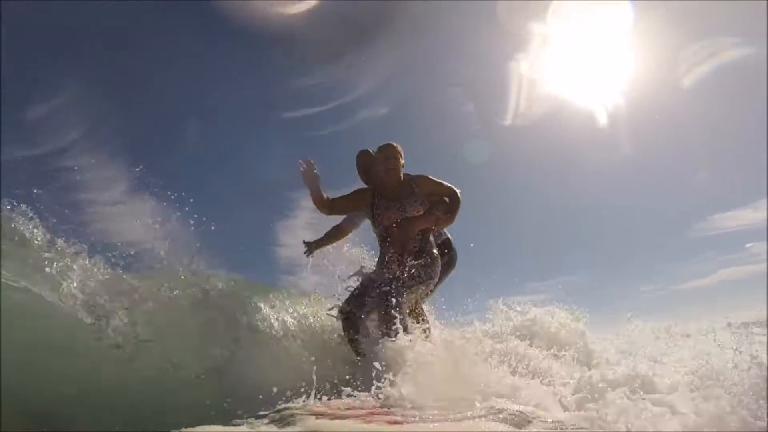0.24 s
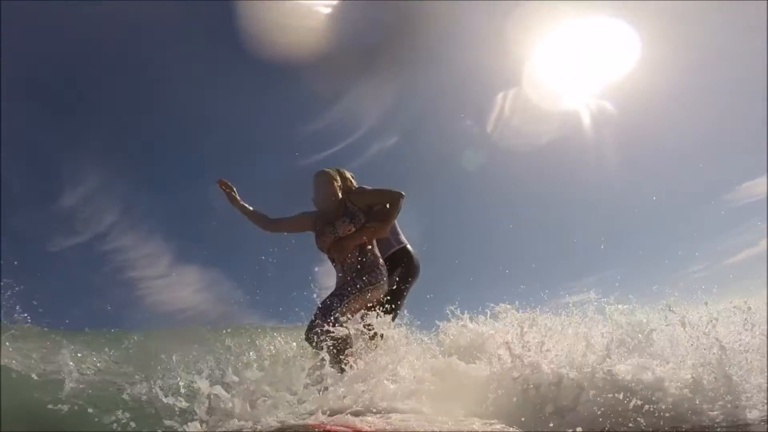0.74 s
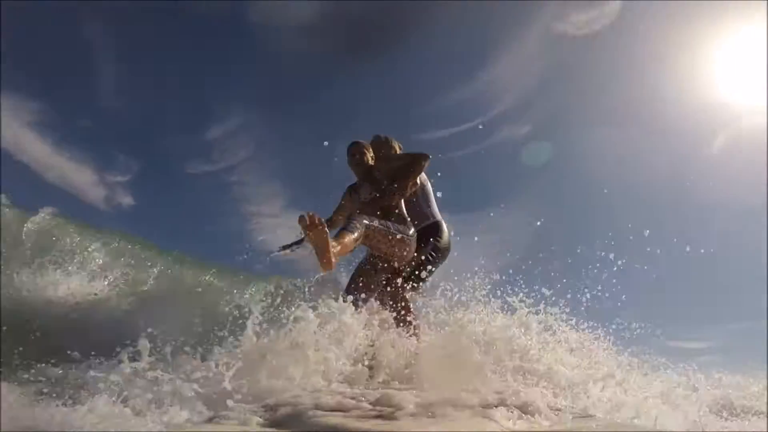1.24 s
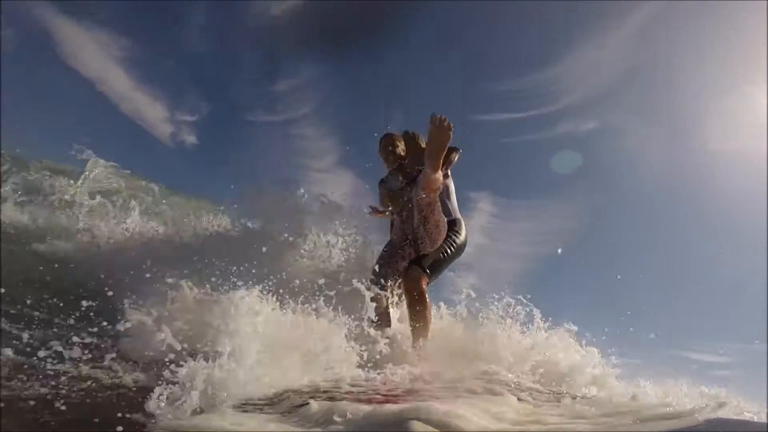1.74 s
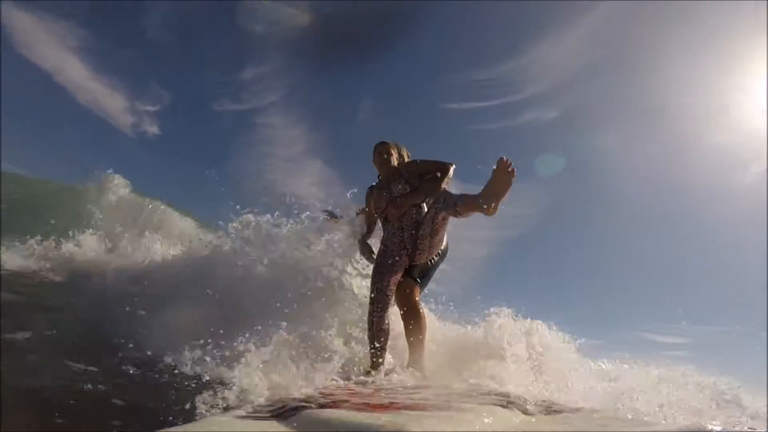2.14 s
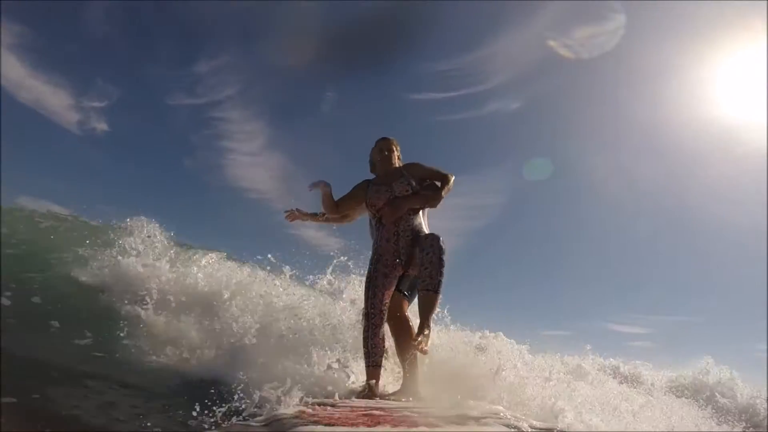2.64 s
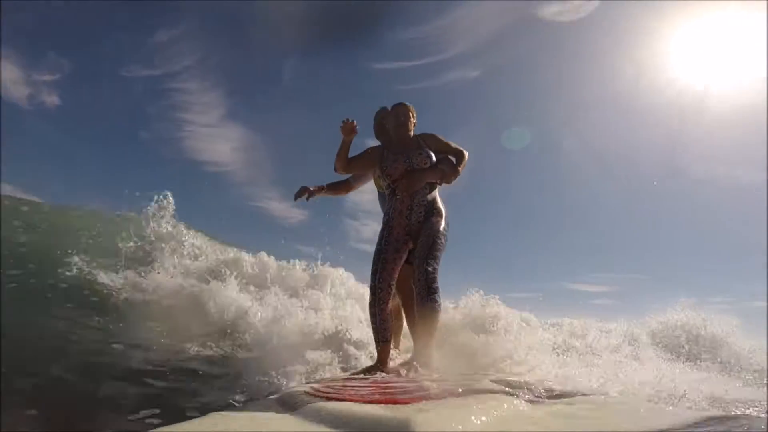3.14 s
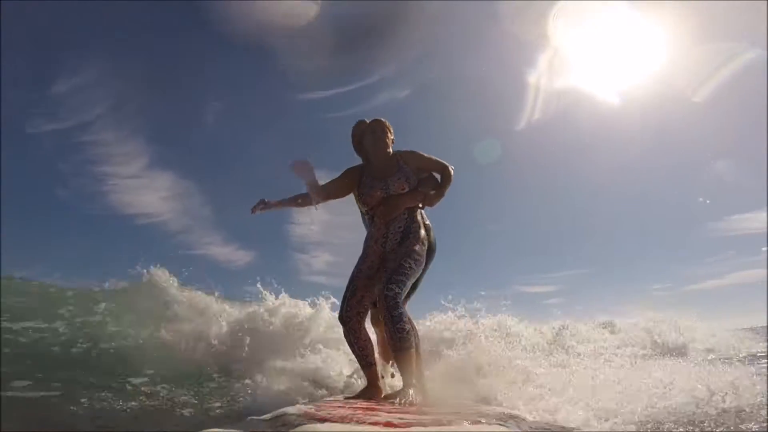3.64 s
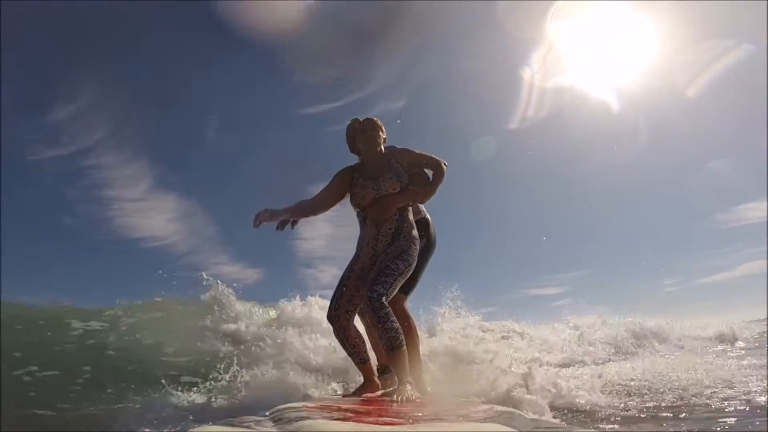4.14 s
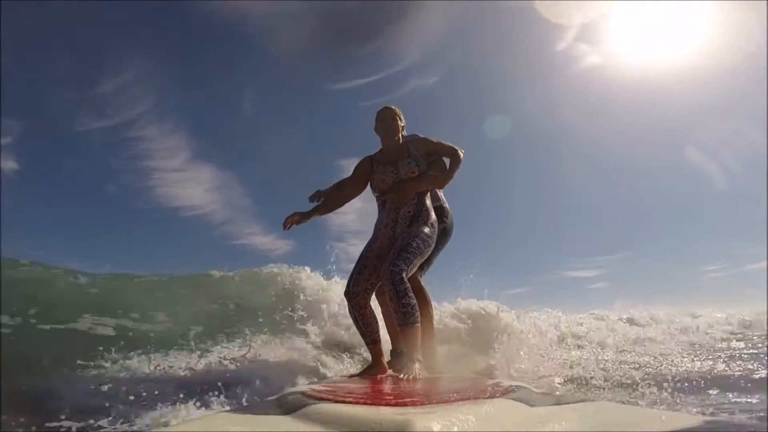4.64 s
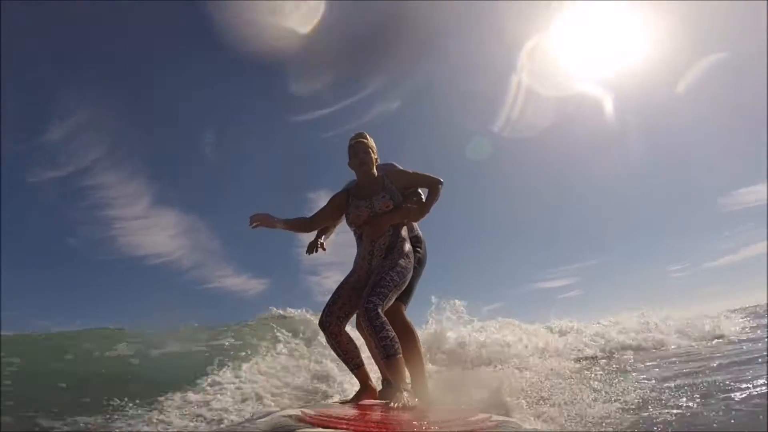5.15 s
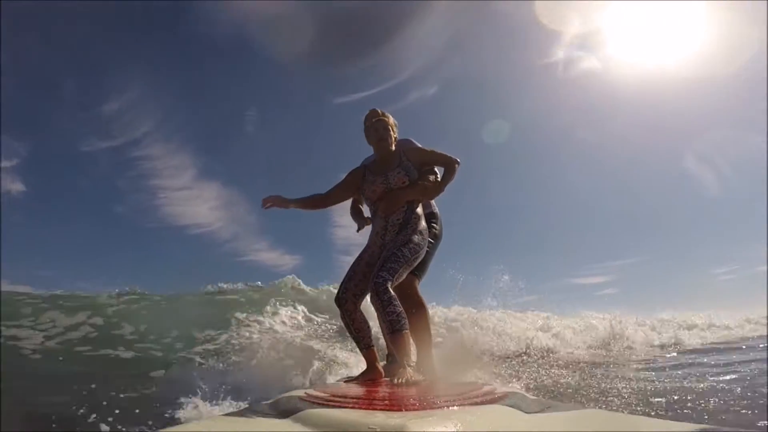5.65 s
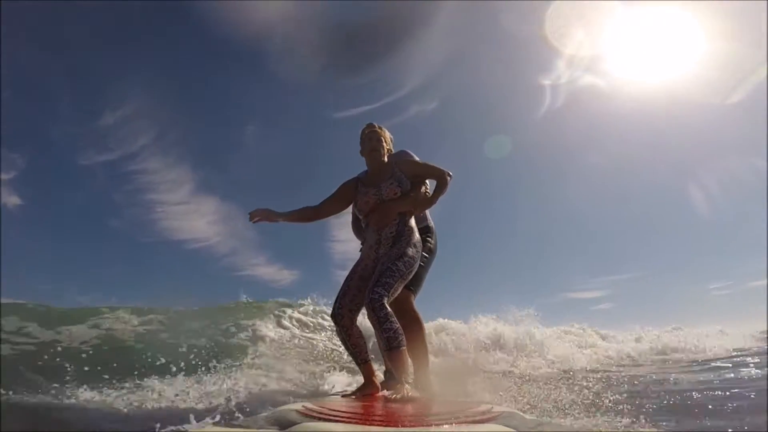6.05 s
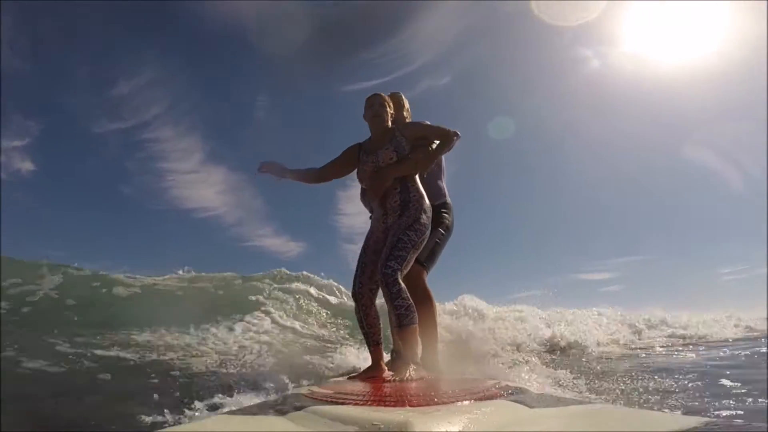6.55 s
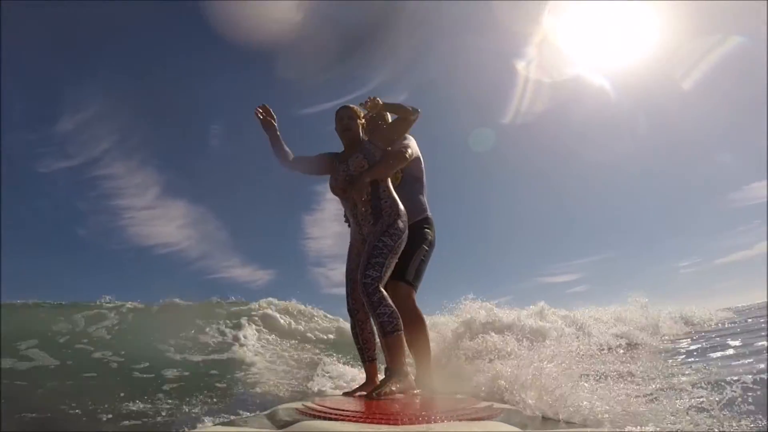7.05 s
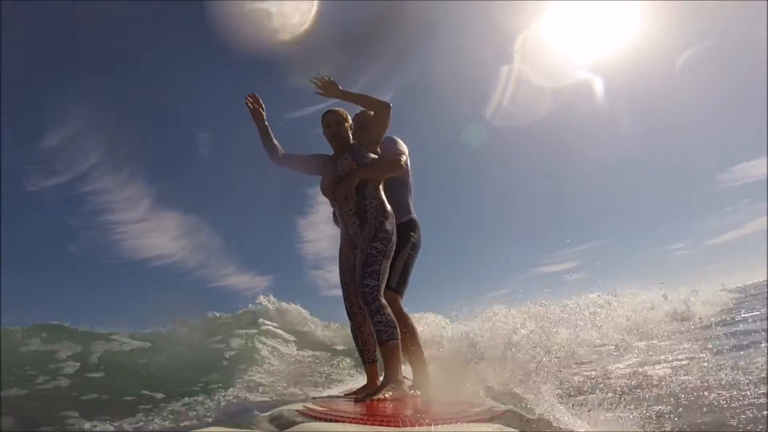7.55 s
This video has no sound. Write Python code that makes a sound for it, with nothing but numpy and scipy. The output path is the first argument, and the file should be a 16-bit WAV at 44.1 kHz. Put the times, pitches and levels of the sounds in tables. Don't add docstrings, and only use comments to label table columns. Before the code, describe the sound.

Heard from inside a sealed housing on a surfboard nose, the wave is muffled and boxy, mostly low-mid slosh over a trembling rumble near 55 Hz, with very little fizz on top. From 0.3 to 0.8 s hollow knocks, backward-sounding air gulps and splashes crowd together, with short rough squeaks at 0.6 and 0.7. A heavy thump lands around 1.35, then looser slaps at 1.7 and 2.2 and a knot of droplet ticks at 2.75. From 2.6 to 4 s rumble and surges swell, with repeated thuds around 3.5 to 3.9 and a faint high whistle just after 3. Near 4.8 to 4.9 it thins for tiny chirps; a strong slap hits at 5.1. Knocks follow at 5.7 and 6 to 6.6, with bright ticks around 6.5. Gulps cluster near 7, a hard splashy crack comes at 7.44, then calmer water.

```python
import sys
import numpy as np
from scipy import signal
from scipy.fft import rfft, irfft
from scipy.io import wavfile
from scipy.ndimage import uniform_filter1d

SR = 44100
rng = np.random.default_rng(int(sys.argv[2]) if len(sys.argv) > 2 else 0)


def generate_wav(signal):
    frames = np.transpose(np.atleast_2d(signal))
    scaled = np.clip(frames, -1, 1) * 32767
    pcm = np.round(scaled).astype(np.int16)
    wavfile.write(sys.argv[1], SR, pcm)


def elevation(decibels):
    levels = np.asarray(decibels, float)
    return 10 ** (levels / 20)


N = 343980
TIME = np.arange(N) / SR
FREQ = np.maximum(np.fft.rfftfreq(N, 1 / SR), 1)


def unit(x):
    return x / np.sqrt(np.mean(x ** 2))


def slope_db(points):
    hz, db = np.transpose(points)
    return np.interp(np.log(FREQ), np.log(hz), db)


def walk(rate):
    hold = int(SR / rate)
    steps = np.repeat(rng.standard_normal(N // hold + 1), hold)
    smooth = uniform_filter1d(uniform_filter1d(steps, hold), hold)
    return unit(smooth[:N])


def bursts(chance, tail_s, spread_db):
    hits = np.zeros(N)
    size_db = -spread_db * np.log(1 - .985 * chance[:, 1])
    np.add.at(hits, (chance[:, 0] * N).astype(int), elevation(size_db) ** 2)
    decay = np.exp(-1 / (tail_s * SR))
    softened = signal.lfilter([1], [1, -decay ** 4], hits)
    power = signal.lfilter([1], [1, -decay], softened)
    return np.sqrt(power + 1e-18)


def swells(steady_db, s, hold_s, db, rise_db_s, fall_db_s):
    power = elevation(steady_db) ** 2
    for at, hold, top_db in zip(s, hold_s, db):
        near = slice(max(int((at - .3) * SR), 0), int((at + hold + .5) * SR))
        t = TIME[near]
        before_db = (at - t) * rise_db_s
        after_db = (t - at - hold) * fall_db_s
        power[near] += elevation(top_db - np.maximum(np.maximum(before_db, after_db), 0)) ** 2
    return 10 * np.log10(power)


def add(out, at_s, hz, db, t60_s, rise_s, rough):
    t = np.arange(int(.25 * SR)) / SR
    drift = np.cumsum(rng.standard_normal(len(t))) * rough * np.sqrt(hz / SR)
    rise = (1 - np.exp(-t / rise_s)) ** 2
    decay = np.exp(-np.log(1000) * t / t60_s)
    ring = np.sin(2 * np.pi * hz * t + drift) * rise * decay
    start = int(at_s * SR)
    out[start:start + len(t)] += (elevation(db) * ring / np.max(np.abs(ring)))[:N - start]


def flow():
    # t/s, churn/dB, spray/dB
    flow_levels = [(0, -27.5, -55), (.6, -22, -56.5), (1.05, -28.5, -62), (1.39, -29, -58),
                   (2.48, -26.5, -58), (3.32, -36.5, -55.5), (3.68, -27, -61.5), (4.12, -29.5, -62),
                   (4.44, -16.5, -60.5), (4.75, -41, -71.5), (4.98, -30, -67.5), (5.33, -43, -69),
                   (5.64, -25.5, -66), (5.98, -28.5, -68), (6.86, -24, -63.5), (7.36, -30.5, -69.5),
                   (7.56, -39, -70.5), (7.8, -36, -62.5)]
    s, churn_db, spray_db = np.transpose(flow_levels)
    return np.interp(TIME, s, churn_db), np.interp(TIME, s, spray_db)


def squeaks():
    # t/s, length/s, start f/Hz, highest f/Hz, level/dB, roughness 0-1
    whistles = [
        (.600, .03, 3000, 3650, -36, .17),
        (.720, .037, 2950, 3250, -41, .05),
        (3.0, .46, 5300, 5350, -61, .16),
        (4.793, .022, 2900, 3900, -57, .12),
        (4.912, .03, 2500, 3650, -43, .15),
    ]
    out = np.zeros(N)
    for s, length_s, start_hz, top_hz, db, rough in whistles:
        done = np.clip((TIME - s) / length_s, 0, 1)
        hz = start_hz + (top_hz - start_hz) * np.sin(2.6 * done)
        jitter = rough * uniform_filter1d(rng.standard_normal(N), size=24)
        phase = np.cumsum(2 * np.pi * hz / SR + jitter)
        octave = elevation(-7 - 200 * rough) * np.sin(2 * phase)
        out += elevation(db) * np.sin(np.pi * done) * (np.sin(phase) + octave)
    return out


def gulps():
    # end t/s, peak level/dB, f/Hz, growth t60/s
    pockets = [(.579, -7.5, 480, 0.12), (.54, -14.5, 1180, 0.055), (.728, -10.5, 376, 0.065),
               (.592, -24, 1160, .05), (0.8, -20, 771, .06), (.42, -19, 542, 0.12), (.562, -9, 600, 0.081),
               (1.435, -12.5, 262, 0.088), (1.605, -12, 199, 0.11), (1.62, -17, 1000, 0.065),
               (1.62, -12.5, 452, 0.05), (2.06, -21, 538, 0.085), (4.47, -13.5, 276, 0.11),
               (4.99, -21, 405, 0.076), (3.497, -12, 476, 0.03), (3.786, -9, 352, 0.073),
               (3.815, -11, 402, .08), (3.826, -20, 997, 0.078), (6.954, -13.5, 361, 0.1),
               (6.997, -9, 211, .08), (7.014, -9.5, 422, 0.052), (7.07, -17, 864, .08),
               (7.137, -19, 566, 0.064), (7.298, -20, 746, 0.054), (7.46, -6, 940, 0.056),
               (7.53, -17.5, 373, .08)]
    out = np.zeros(N)
    for s, db, hz, t60_s in pockets:
        add(out, N / SR - s, hz, db, t60_s, rise_s=0.0012, rough=0.65)
    return signal.sosfilt(signal.butter(4, 1900, fs=SR, output="sos"), out[::-1])


def drops():
    # t/s, upper ring level/dB, lower ring level/dB, lower ring f/Hz
    big_drops = [(0.219, -31, -28, 2800), (0.684, -43, -29.5, 2600), (0.785, -39, -48, 2700),
                 (0.841, -29.5, -31, 2850), (1.261, -47, -36.5, 2980), (1.3456, -31, -42, 2900),
                 (1.417, -43, -26.5, 3020), (1.4427, -41, -33, 3000), (2.151, -36, -29.5, 2850),
                 (2.161, -44, -33, 3300), (2.177, -31, -42, 2850), (2.731, -46, -27, 2850),
                 (2.7416, -36, -24, 2940), (2.7445, -47, -27, 2750), (2.7495, -42, -45, 2800),
                 (2.7565, -38, -45, 3000), (2.7533, -41, -27, 3300), (2.7604, -35, -36, 2700),
                 (3.822, -54, -31.5, 2940), (3.955, -50, -30, 2850), (3.9777, -37, -36, 3230),
                 (4.985, -49, -29, 2850), (5.009, -31, -29, 3000), (5.1317, -40, -40, 2800),
                 (5.138, -36, -36, 3200), (5.2205, -36, -39, 2900), (5.226, -36, -44, 3200),
                 (5.7593, -33.5, -49, 3300), (6.356, -27, -29.5, 3020), (6.459, -26, -21, 3180),
                 (6.483, -25.5, -30, 3220), (6.76, -48, -49, 3000), (6.5062, -32, -36, 3470),
                 (7.45, -46, -38, 3370), (7.457, -46, -30, 2770), (7.463, -45, -40, 3500),
                 (7.474, -52, -42, 3370), (7.492, -52, -41, 3280)]
    # t/s, upper ring level/dB, lower ring level/dB
    specks = [(.2074, -40, -40), (.8314, -45, -47), (1.2817, -45, -47), (1.4087, -42.5, -37),
              (1.4225, -44, -44), (2.038, -47, -36), (2.0742, -43, -37), (2.117, -45, -36),
              (2.185, -39, -46), (2.196, -45, -44), (2.3501, -56, -35), (2.3984, -55, -44),
              (3.266, -51, -40), (3.885, -44, -46), (3.8984, -39, -45), (3.989, -36, -42),
              (3.997, -36, -51), (4.1045, -39, -40), (4.2712, -52, -43), (4.3914, -44, -42),
              (4.4403, -41, -52), (4.474, -41, -60), (4.4823, -37, -40), (4.5136, -47, -38),
              (4.4445, -42, -48), (4.4935, -39, -37), (4.6289, -44, -45), (4.6405, -50, -42),
              (4.844, -56, -50), (4.9152, -52, -48), (4.925, -46, -45), (4.936, -52, -31),
              (4.9395, -48, -35), (4.9674, -52, -38), (5.016, -50, -46), (5.122, -48, -42),
              (5.144, -42, -39), (5.153, -35, -46), (5.1624, -44, -51), (5.2001, -43, -38),
              (5.2345, -50, -48), (5.2455, -49, -47), (5.2616, -41, -42), (5.3865, -61, -42),
              (5.7329, -48.5, -40), (5.7405, -50, -49), (6.2981, -44, -37), (6.3174, -43, -41),
              (6.326, -43, -41), (6.348, -37, -43), (6.4516, -44, -40), (6.4944, -41, -45),
              (6.4675, -40, -46), (6.3625, -43, -46), (6.305, -46, -42), (6.379, -46, -48),
              (5.0135, -45, -46), (7.444, -51, -37), (7.468, -52, -33), (7.48, -55, -38)]
    # f/Hz, level/dB, t60/s
    upper_rings = [(3830, 1.5, 0.0021), (4500, 4.5, 0.0034), (5060, 4.5, 0.009), (5600, 2, 0.013),
                   (6400, -6, 0.0049)]
    snap_pitches = (4250, 5510)
    upper, snaps, lower = np.zeros((3, N))
    pitch_hz = 2850 * (1 + 0.1 * rng.standard_normal(len(specks)))
    small_drops = [(*row, hz) for row, hz in zip(specks, pitch_hz)]
    for s, upper_db, lower_db, hz in big_drops + small_drops:
        add(lower, s + 0.0008, hz, lower_db + 2.5, t60_s=0.0093, rise_s=0.00059, rough=0.8)
        add(lower, s, 2160, lower_db - 10.5, t60_s=0.015, rise_s=0.0012, rough=0.26)
        snaps[int((s + .0004) * SR)] += elevation(upper_db + 10.5)
        for snap_hz in snap_pitches:
            add(snaps, s, snap_hz, upper_db - 12, t60_s=0.0084, rise_s=0.00015, rough=1.6)
        for ring_hz, ring_db, t60_s in upper_rings:
            stray = rng.standard_normal(2)
            stray_hz = ring_hz * (1 + .04 * stray[0])
            stray_db = upper_db + ring_db - 13 + 1.1 * stray[1]
            add(upper, s, stray_hz, stray_db, t60_s, rise_s=0.00019, rough=0.38)
    snaps = signal.sosfilt(signal.butter(3, 3600, "high", fs=SR, output="sos"), snaps)
    lower = signal.sosfilt(signal.butter(4, 3880, fs=SR, output="sos"), lower)
    return signal.sosfilt(signal.butter(7, 6300, fs=SR, output="sos"), upper + snaps + lower)


def slaps():
    # t/s, peak level/dB, f/Hz, t60/s
    hull_slaps = [(0.179, -12, 335, .06), (0.334, -12, 404, 0.074), (0.453, -0.5, 937, 0.026),
                  (0.625, -10, 355, 0.072), (0.75, -2.5, 239, 0.061), (1.352, 1, 195, 0.077),
                  (1.541, -15, 369, .06), (1.693, -5, 375, 0.065), (1.838, -11.5, 296, .06),
                  (2.205, -4.5, 153, .08), (2.378, -17, 350, 0.08), (2.635, -3.5, 337, 0.1),
                  (2.682, -24, 415, 0.064), (2.758, -27, 341, 0.092), (2.943, -10.5, 152, 0.13),
                  (3.187, -4, 345, 0.097), (3.26, -7.5, 571, 0.15), (3.491, -1.5, 362, 0.081),
                  (3.523, -1, 252, 0.095), (3.578, -10, 342, 0.071), (3.613, -13, 377, 0.098),
                  (3.66, -4.5, 377, 0.099), (3.749, 1, 163, 0.095), (3.884, 4, 344, 0.035),
                  (4.249, -6.5, 269, 0.17), (4.71, -15, 263, 0.086), (4.981, -14, 401, 0.097),
                  (5.12, 3, 344, 0.094), (5.173, -7.5, 248, 0.13), (5.526, -12, 462, 0.11),
                  (5.624, -6, 161, 0.058), (5.674, -0.5, 338, 0.042), (5.712, -4, 365, 0.094),
                  (5.947, -8.5, 369, 0.25), (6.121, -9, 336, 0.092), (6.207, -10, 195, .07),
                  (6.272, -3.5, 266, 0.06), (6.384, -10.5, 250, 0.05), (6.433, -7, 370, 0.087),
                  (6.484, -5, 377, 0.2), (6.506, -12, 400, .07), (6.605, -1.5, 260, 0.15),
                  (6.926, -3.5, 376, 0.2), (7.166, -10, 263, 0.086), (7.391, -11, 278, 0.055),
                  (7.437, 0, 400, 0.069), (7.447, -5, 605, 0.045)]
    # t/s, peak level/dB, f/Hz, t60/s
    deck_knocks = [(0.342, -4.5, 1033, 0.052), (0.454, -19, 920, 0.065), (.459, -3.5, 970, 0.046),
                   (.3, -13, 563, .07), (.503, -6, 603, 0.053), (.533, -4, 710, 0.06),
                   (0.553, -3, 605, 0.05), (0.567, 5, 483, 0.051), (.628, -5, 810, .04),
                   (.636, 0.5, 769, 0.072), (.675, -6, 730, 0.033), (.722, -7, 413, 0.031),
                   (1.161, -8, 617, 0.039), (1.192, -17, 705, 0.042), (1.717, -10, 716, 0.05),
                   (2.059, -17, 548, 0.072), (2.685, -9, 685, 0.089), (4.336, -9, 658, 0.037),
                   (4.446, -12, 526, 0.025), (4.7, -12, 546, 0.048), (4.964, -15, 884, .06),
                   (5.08, -13, 620, 0.05), (5.124, -1.5, 685, 0.047), (5.649, -10, 594, 0.055),
                   (5.957, -14, 600, 0.043), (6.232, -3.5, 984, 0.024), (6.983, -10, 770, 0.04),
                   (7.439, -2.5, 823, 0.045), (7.458, -7, 1310, 0.02)]
    out = np.zeros(N)
    for rows, rise_s in ((hull_slaps, .0025), (deck_knocks, .0009)):
        for s, db, hz, t60_s in rows:
            add(out, s, hz, db - 9.5, max(t60_s, .01), rise_s, rough=0.52)
            add(out, s, 1.9 * hz, db - 26, max(0.29 * t60_s, .01), rise_s=0.00063, rough=0.51)
    return signal.sosfilt(signal.butter(4, 1900, fs=SR, output="sos"), out)


def body_response():
    # f/Hz, level/dB per Hz
    housing = [(60, -22.5), (85, -8), (109, -11), (178, -4.5), (419, -4), (740, -8), (1100, -18.5),
               (1390, -24), (1950, -35), (3330, -43.5), (3750, -51.5), (5400, -58), (7000, -66),
               (7700, -72.5)]
    # f/Hz, width/Hz, level/dB
    resonances = [(157.8, 20, 4.5), (232.2, 9.9, -10.5), (263, 59, 2.5), (307.4, 48, -5.5), (344, 40, 1.5),
                  (557, 130, -3), (770, 110, 2.5), (964.6, 18, 6), (1230, 240, 7), (1345, 100, -4),
                  (1830, 56, 4.5), (1910, 140, -4), (2156, 98, 6), (2643, 560, 8.5), (3720, 86, -6),
                  (5400, 540, 0)]
    body_db = slope_db(housing)
    for hz, width, db in resonances:
        body_db = body_db + db / (1 + ((FREQ - hz) / (width / 2)) ** 2)
    return elevation(body_db)


def water_levels():
    # share that follows the churn 0-1, steady level/dB, surge level/dB, brightness weight
    layers = [
        (1, 1.5, -2, 0.01),
        (0.76, 7, -7, 1.01),
        (0.19, 11.5, -27, 1.76),
        (0, 0, -54, 1),
    ]
    # t/s, hold/s, level/dB, brightness/dB
    surges = [(0.106, 0.11, -24, 6), (0.337, 0.01, -22, -0.5), (0.463, 0.075, -34, 14),
              (0.576, 0.089, -27.5, 5), (0.736, 0.071, -17, -10.5), (1.335, 0.14, -20.5, -29),
              (1.58, 0.0037, -18, 2), (1.698, 0.06, -26, 4.5), (2.244, 0.18, -33.5, 7),
              (2.475, 0.15, -39.0, 16), (2.605, 0.13, -19.5, -4.5), (2.885, 0.082, -18, -3),
              (3.09, 0.079, -15.5, -3.5), (3.177, 0.25, -21.5, 0.5), (3.494, 0.035, -13, -9),
              (3.634, 0.0057, -16, -29), (3.756, 0.064, -13.5, -3.5), (4.263, 0.079, -17.5, -2.5),
              (4.408, 0.01, -29, -5), (4.702, 0.051, -24.5, -1), (5.124, 0.045, -16.5, -4.5),
              (5.69, 0.11, -20.5, -1), (5.963, 0.025, -17, -6), (6.28, 0.033, -16, 0.5),
              (6.478, 0.04, -23.5, 3), (6.6, 0.017, -15, -3.5), (6.937, 0.13, -19, 4),
              (7.103, 0.16, -24.5, 6), (7.461, 0.016, -18, 3)]
    # t/s, hold/s, level/dB, brightness/dB
    splashes = [(.455, 0.0072, -30, 16.5), (.555, 0.015, -25, 6), (.572, .012, -28.5, 13),
                (.64, 0.043, -22.5, 8), (1.192, .006, -22, -6), (1.61, 0.0096, -27, 1),
                (1.718, .008, -25, 7.5), (2.64, 0.022, -31, -7), (2.686, .008, -24, 3),
                (4.336, .008, -26.5, 3), (4.444, .008, -27, 5), (5.08, .006, -23, -1),
                (5.122, 0.025, -31, 9.5), (6.235, .015, -21, -7), (6.983, 0.0071, -27, -6),
                (7.442, 0.012, -13.5, 3.5), (7.46, 0.019, -35, 14.5)]
    churn_db, spray_db = flow()
    levels_db = []
    for share, steady_db, offset_db, weight in layers:
        db = steady_db + share * churn_db + (1 - share) * spray_db
        for rows, rise_db_s, fall_db_s in ((surges, 157.5, 139.5), (splashes, 1999.5, 355)):
            s, hold_s, top_db, bright_db = np.transpose(rows)
            event_db = top_db + offset_db + weight * bright_db
            db = swells(db, s, hold_s, event_db, rise_db_s, fall_db_s)
        levels_db.append(db)
    return levels_db


def whitewater():
    # lowest f/Hz, highest f/Hz
    water_bands = [
        (110, 480),
        (480, 1400),
        (1500, 3500),
        (3800, 7000),
    ]
    # t/s, half length/s
    treble_dips = [
        (.580, .0045),
        (1.028, .004),
        (5.422, .0025),
    ]
    # t/s, level/dB
    low_levels = [(0, 0.5), (.7, 0), (1, 1), (1.4, 1.5), (2, 0), (2.7, 0), (2.95, -3), (3.4, -2), (3.8, 2),
                  (4.3, -0.5), (4.8, -1), (5.2, 0), (5.4, -2), (5.9, -2), (6.5, -1), (7.2, 0.5), (7.5, -4),
                  (7.8, -7)]
    # end t/s, change of level/dB
    lead_ins = [(.453, -4), (1.160, -4), (1.191, -3), (1.716, -3), (2.685, 4), (3.261, -2), (4.335, -1),
                (4.444, -6), (5.079, -1), (5.958, 1), (6.232, -3), (6.981, -4), (7.438, 0)]
    body = body_response()
    gains_db = []
    for db, (lo, hi) in zip(water_levels(), water_bands):
        passed = np.sum(body[(FREQ > lo) & (FREQ < hi)] ** 2)
        gains_db.append(db - 10 * np.log10(passed))
    slop = unit(bursts(rng.random((500, 2)), tail_s=0.0086, spread_db=3)[::-1])
    fizz = unit(bursts(rng.random((1500, 2)), tail_s=0.0017, spread_db=3.5))
    treble_dip_db = -sum(30 * np.exp(-((TIME - s) / half_s) ** 2) for s, half_s in treble_dips)
    low_level_db = np.interp(TIME, *np.transpose(low_levels))
    lead_in_db = sum(db * (TIME < s) * np.exp(-((TIME - s) / 0.0066) ** 2) for s, db in lead_ins)
    centres = np.log2([230, 820, 2300, 5000])
    out = np.zeros(N)
    for octave in np.arange(19, 41) / 3:
        place = np.interp(octave, centres, np.arange(4))
        below = min(int(place), 2)
        gain_db = gains_db[below] + (place - below) * (gains_db[below + 1] - gains_db[below])
        if octave > 11.6:
            gain_db = gain_db + treble_dip_db
        gain_db = gain_db + low_level_db * np.clip(2 * (np.log2(290) - octave), 0, 1)
        if 8.5 < octave < 11.6:
            gain_db = gain_db + lead_in_db
        fine = np.clip((octave - 10.2) / 0.38, 0, 1)
        splash = unit(1.83 + 0.32 * (1 - fine) * slop + .5 * fine * fizz)
        skirt = np.cos(np.pi / 2 * np.clip(3 * (np.log2(FREQ) - octave), -1, 1))
        noise = rfft(rng.standard_normal(N) * splash)
        band = irfft(noise * skirt * body, N) * np.sqrt(N / 2)
        out += band * elevation(gain_db + 1.49 * walk(12))
    return out


def mount():
    # f/Hz, level/dB per Hz
    mount_colour = [(8.8, -42), (15, -4.5), (43, -1.5), (54, 9), (67, -1), (74, -15.5), (86, -16),
                    (110, -22), (140, -49.5), (240, -120)]
    # t/s, hold/s, level/dB
    jolts = [(0, 0.081, -15), (0.16, 0.35, -21.5), (0.558, .14, -21.5), (0.754, 0.15, -15.5),
             (1.085, 0.024, -18.5), (1.155, 0.046, -20), (1.254, 0.082, -19.5), (1.455, .02, -20),
             (1.52, .05, -18.5), (1.643, 0.017, -17.5), (1.792, .03, -21), (2.04, .05, -19),
             (2.142, 0.05, -19.5), (2.294, 0.095, -14.5), (2.624, 0.13, -12), (2.804, 0.023, -14.5),
             (2.926, 0.023, -21), (3.046, 0.15, -16.5), (3.312, 0.041, -11.5), (3.486, 0.066, -14),
             (3.585, .02, -11), (3.66, .01, -20), (3.734, .02, -20), (3.855, .01, -8), (3.947, 0.022, -16),
             (4.214, 0.12, -16), (4.396, 0.13, -11), (4.618, .03, -26), (4.774, 0.045, -28),
             (4.916, 0.015, -25), (5.01, .01, -26), (5.125, .02, -17.5), (5.192, 0.015, -11),
             (5.353, 0.081, -38), (5.54, .01, -27), (5.72, .02, -16.5), (5.815, .01, -19),
             (5.927, 0.011, -21), (6.158, 0.042, -23), (6.267, 0.13, -16.5), (6.454, 0.095, -22.5),
             (6.593, .01, -25.5), (6.66, 0.044, -19), (6.792, 0.05, -18), (6.917, 0.11, -18),
             (7.1, 0.12, -31.5), (7.268, .14, -22), (7.5, 0.11, -26)]
    shake = unit(irfft(rfft(rng.standard_normal(N)) * elevation(slope_db(mount_colour)), N))
    swing = uniform_filter1d(np.abs(signal.hilbert(shake)), size=900)
    churn_db, _ = flow()
    tremble_db = -2.5 + 0.9 * churn_db
    push_db = swells(tremble_db, *np.transpose(jolts), rise_db_s=300, fall_db_s=239.5)
    gusts = shake / (swing + .2) ** .85 * elevation(push_db)
    gusts = gusts * elevation(1.5 * walk(22))
    return elevation(5.5) * signal.sosfiltfilt(signal.butter(4, 84, fs=SR, output="sos"), gusts)


def scene():
    return (squeaks() + gulps() + drops() + slaps() + whitewater() + mount())[None]


def top_cut(x):
    return signal.sosfilt(signal.butter(12, 8000, fs=SR, output="sos"), x)


def record(dry):
    soft = np.tanh(.9 * dry) / .9
    narrow = signal.sosfiltfilt(signal.cheby2(10, 30, 7910, fs=SR, output="sos"), soft)
    return top_cut(narrow)


dry = scene()
out = record(dry)
generate_wav(out)
```